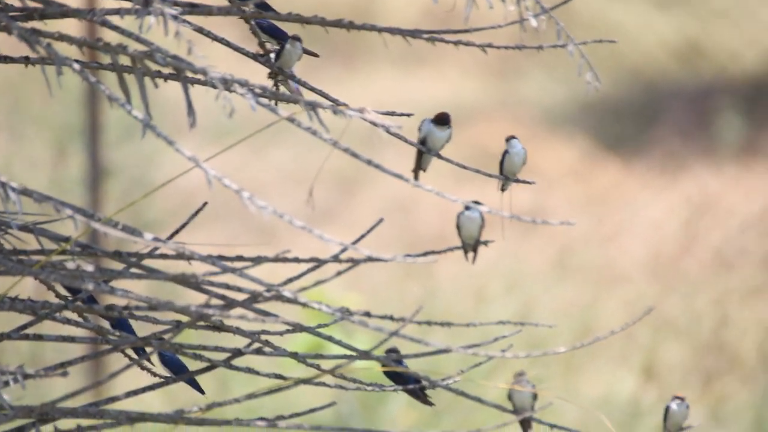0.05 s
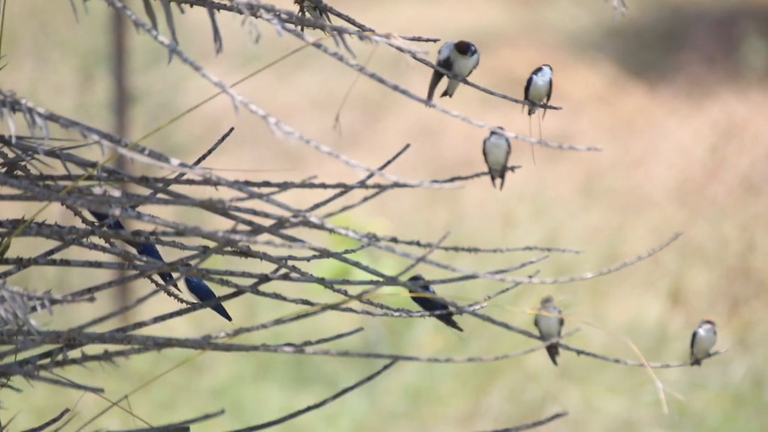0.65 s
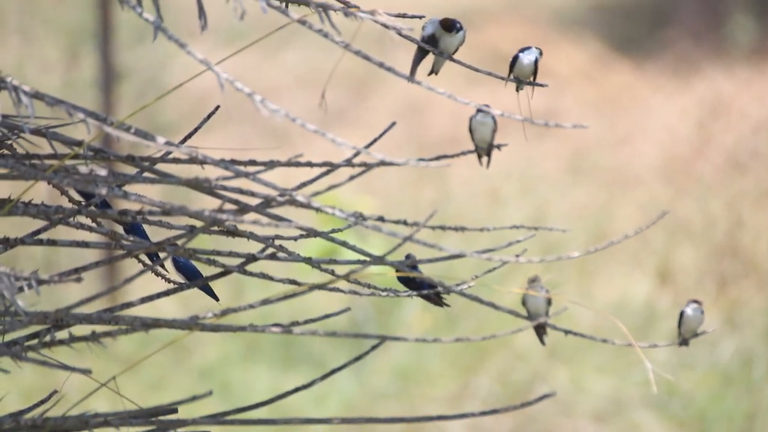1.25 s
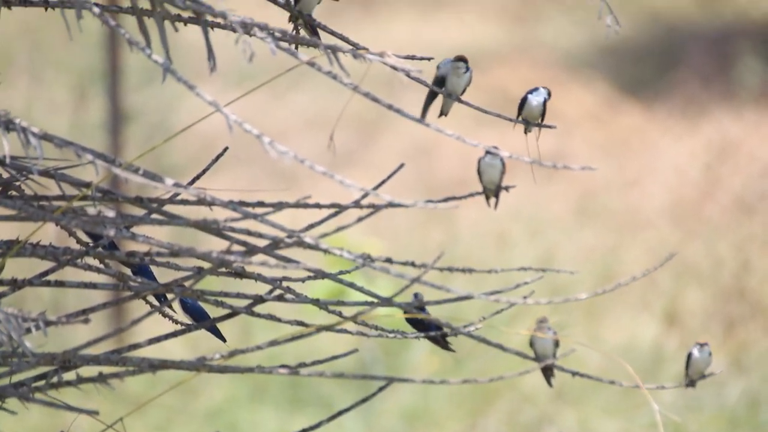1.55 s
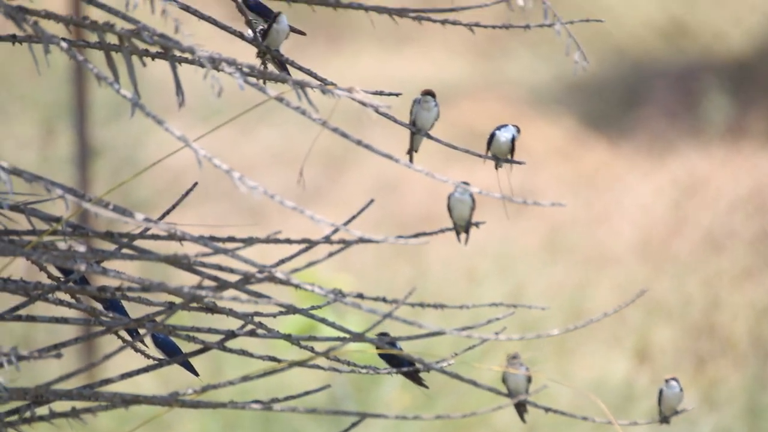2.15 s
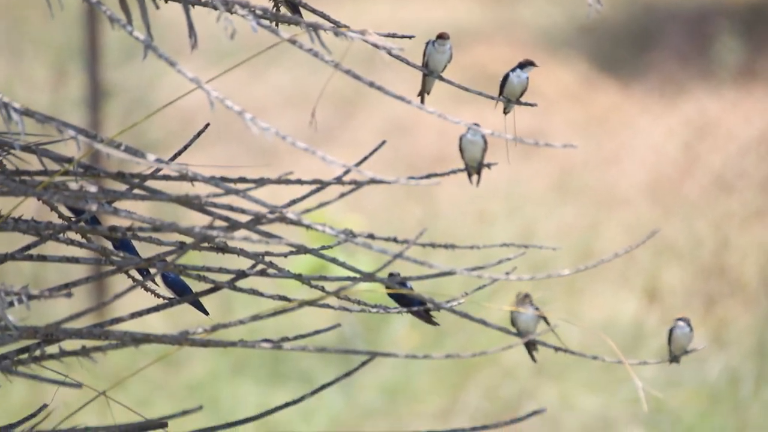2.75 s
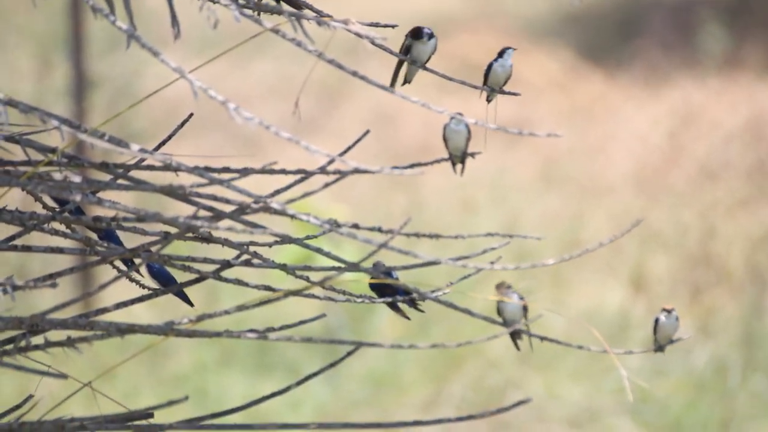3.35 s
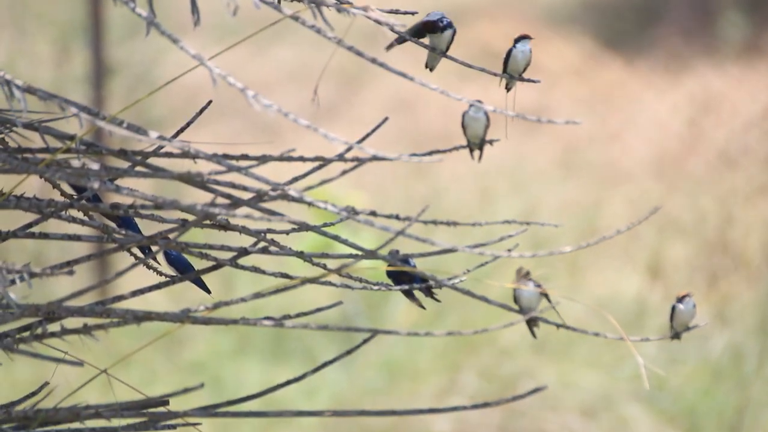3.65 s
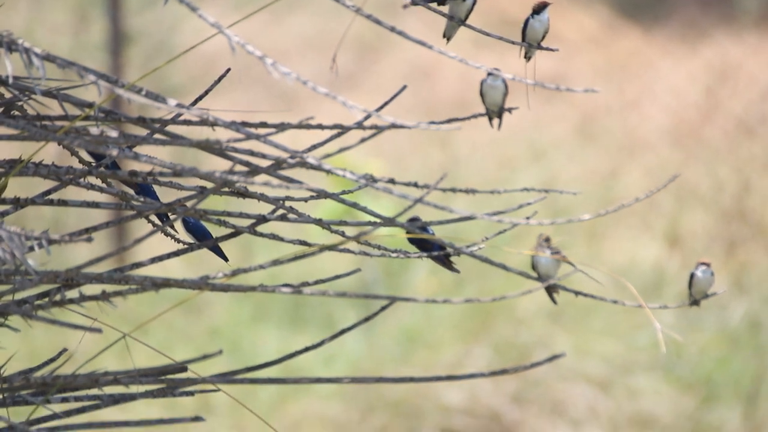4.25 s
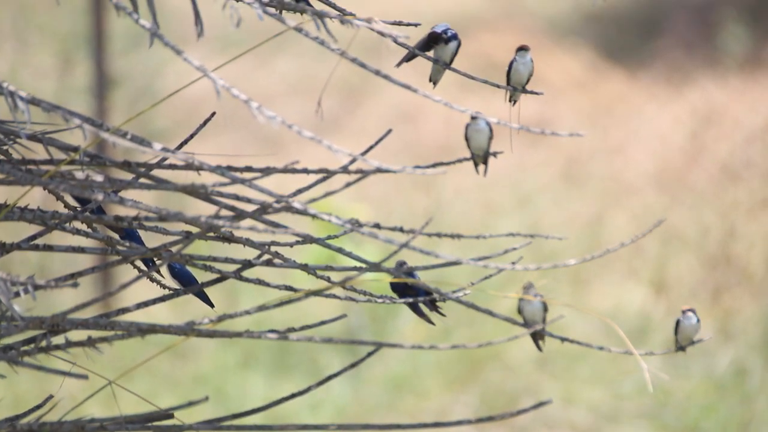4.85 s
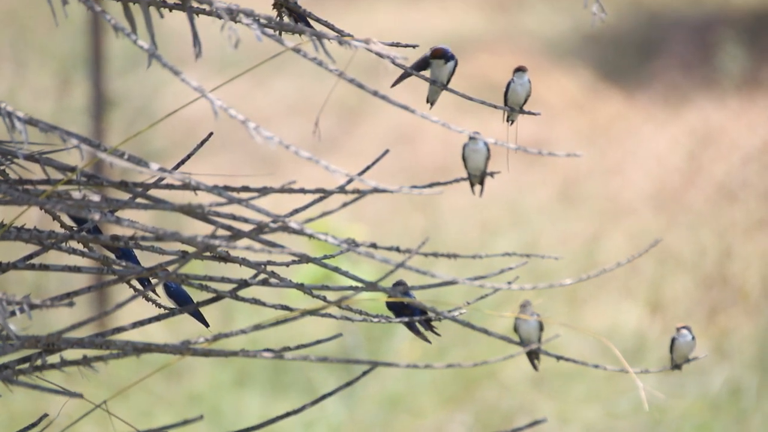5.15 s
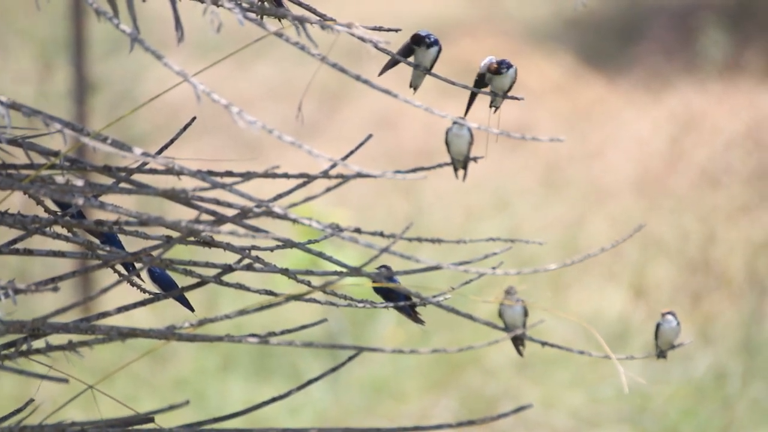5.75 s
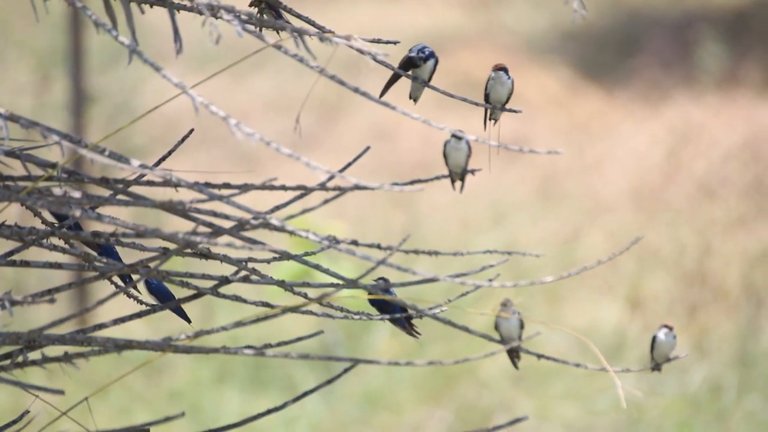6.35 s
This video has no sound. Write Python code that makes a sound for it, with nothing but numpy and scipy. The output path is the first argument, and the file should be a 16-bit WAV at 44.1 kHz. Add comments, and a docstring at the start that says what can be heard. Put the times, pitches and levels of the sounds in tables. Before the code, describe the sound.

Swallows twitter outdoors in quick, high chirps and raspy notes over a faint hiss of air.

```python
"""Swallows twitter in a thicket: quick falling slurs and chips sung with both sides of the syrinx.
Two phrases come twice each among loose chips, whistles, rasps of a flapping membrane, low nasal calls
and small knocks; a rising wheeze, a rattle of clicks and four hoarse whines lead to a last few chips.
A soft haze of hiss surrounds the twittering, and the trees scatter the song back. The air hisses faintly
and a light breeze rumbles on a mono microphone."""
import sys
import numpy as np
from scipy import signal
from scipy.fft import rfft, irfft, next_fast_len
from scipy.io import wavfile
from scipy.ndimage import map_coordinates

SR = 44100
rng = np.random.default_rng(int(sys.argv[2]) if len(sys.argv) > 2 else 0)


def int16_out(signal):
    """Quantize to a 16-bit WAV file."""
    q = np.round(np.clip(np.atleast_2d(signal).T, -1, 1) * 32767)
    wavfile.write(sys.argv[1], SR, q.astype(np.int16))


N = 287072

# Loose syllables. Each row: time in seconds, kind, pitch in Hz, relative level in dB.
# A chip is timed and pitched at its crest; a slur is timed at its start and pitched at mid-range.
LOOSE_SYLLABLES = [(0, "slur", 3450, -27.5), (.109, "tchit", 4960, -27), (.956, "tchit", 4660, -25),
                   (1.06, "chup", 3716, -24), (1.14, "slur", 3650, -30.5), (1.209, "tsip", 3430, -22),
                   (1.947, "tsip", 3505, -29), (2.088, "tsip", 3790, -26.5), (2.933, "tsip", 3600, -22),
                   (3.165, "squeak", 6310, -24.5), (3.291, "squeak", 5614, -20), (3.402, "tsip", 3770, -20),
                   (3.496, "slur", 3500, -25.5), (5.628, "slur", 4010, -35), (5.67, "squeak", 5010, -26.5),
                   (5.763, "squeak", 5230, -26), (5.915, "squeak", 5170, -32), (6.036, "slur", 4020, -42)]
# The opening phrase and a quicker flourish.
# Each row: time from the phrase's accent in seconds, kind, pitch in Hz, relative level in dB.
OPENING_PHRASE = [(-.097, "chup", 3790, -24), (-.037, "slur", 5100, -33), (0, "tsee", 5760, -18.5),
                  (.07, "slur", 3930, -32.5), (.145, "tchit", 5020, -22.5), (.298, "squeak", 4120, -25),
                  (.349, "chup", 3480, -21)]
FLOURISH_PHRASE = [(-.039, "tsip", 3670, -24), (0, "tchit", 4980, -22), (.077, "slur", 3380, -24),
                   (.102, "squeak", 3980, -21.5)]
# When each phrase is sung. Each entry: time of the accent in seconds.
OPENING_TIMES = [.34, 1.483]
FLOURISH_TIMES = [2.257, 2.687]
# Kinds of chip. Each row: pitch ratio of second to leading voice, second voice's relative level in dB,
# half the rise time in seconds, typical share of the pitch climbed, overtone gain in dB.
CHIP_KINDS = {"tchit": (.68, -4, .024, .25, 1.5), "tsee": (0.6, -14, .018, .15, -3),
              "squeak": (.8, -5, .016, .27, -1), "chup": (1.28, -8.5, .02, .19, -4),
              "tsip": (1.52, -10.5, .018, .25, -4)}
# One-voiced glides. Each row: start and length in seconds, first and last pitch in Hz, relative dB.
GLIDES = [(0.743, 0.087, 4000, 3190, -24.5), (.838, .06, 3175, 2970, -33), (3.408, .02, 3700, 3750, -26),
          (3.767, 0.026, 3650, 4340, -24.5), (3.795, 0.0227, 3185, 4010, -16.5),
          (3.984, 0.086, 3086, 3320, -37), (5.995, .05, 3600, 4230, -36.5), (6.478, .032, 5200, 6000, -38)]
# Harsh notes. Each row: start and length in seconds, pitch in Hz, level in dB.
RASP_NOTES = [(0.618, 0.062, 3060, -29), (.765, .11, 3000, -31), (1.227, .067, 2567, -33),
              (1.923, 0.071, 2955, -27.5), (2.464, 0.11, 2557, -31), (2.915, 0.081, 2953, -29),
              (3.034, .15, 2700, -27.5), (3.24, .075, 3400, -29), (3.248, .033, 5310, -21.5),
              (3.336, 0.042, 4400, -25), (3.517, .094, 2802, -26.5), (3.625, .05, 5200, -24.5),
              (3.635, 0.086, 3650, -23), (4.371, .012, 3760, -19), (4.665, 0.013, 3800, -20),
              (5.895, .058, 3100, -30.5)]
# Low calls. Each row: start and length in seconds, first and last pitch in Hz, level in dB.
NASAL_CALLS = [(2.532, .15, 419.3, 410.7, -35), (3.547, 0.21, 385.3, 331, -41),
               (3.763, 0.077, 433.6, 452.5, -36)]
# Knocks in the branches. Each row: start in seconds, ring frequency in Hz, initial ring level in dB.
KNOCKS = [(3.131, 345, -39), (5.982, 952, -36.5), (6.133, 970, -37.5)]
# Course of the wheeze. Each row: time in seconds, pulse rate in Hz, level in dB.
WHEEZE_COURSE = [(3.92, 440, -47), (4.0, 452, -39), (4.11, 531, -34.5), (4.18, 547, -34),
                 (4.33, 622.4, -28.5), (4.37, 616, -30)]
# Hoarse, drawn-out notes. Each row: start and length in seconds, relative level in dB.
WHINE_NOTES = [(4.681, 0.11, -33.5), (4.905, 0.12, -35.5), (5.101, .085, -35.5), (5.235, .1, -35)]
# Buffets of wind. Each row: time of the peak in seconds, typical peak level in dB.
WIND_GUSTS = [(1.2, -62), (1.62, -56.5), (1.97, -52.5), (2.52, -49), (5.35, -62)]
# Spectra of the outdoor air, the hiss in and around the song, the throat's resonances and the clicks.
# Each row: frequency in Hz, relative level in dB.
AIR_SPECTRUM = [(30, -13.5), (150, -7.5), (310, -4), (600, -10), (1000, -4), (2700, -2.5), (8100, -15.5),
                (15500, -44.5)]
HISS_SPECTRUM = [(900, -17), (3300, 7), (6300, 1), (8200, -12), (9700, -16.5), (12300, -15.5), (16000, -27)]
THROAT_SPECTRUM = [(1000, -18.5), (2700, -19), (4000, 0.5), (5300, -4), (9500, -42), (12000, -24),
                   (15000, -45)]
CLICK_SPECTRUM = [(1000, -21), (4500, -3), (7200, 4.5), (9500, -15), (16000, -25)]
# Reverberation of the trees. Each row: frequency in Hz, time to decay by 60 dB in seconds.
THICKET_T60 = [(300, 0.71), (4000, 0.62), (13000, 0.086)]


def amp(db):
    """Decibels as an amplitude ratio."""
    return 10 ** (np.asarray(db) / 20)


def unit(x):
    """The signal scaled to rms 1."""
    return x / np.sqrt(np.mean(x ** 2) + 1e-20)


def along(points, hz):
    """Interpolation of (Hz, value) points on a log frequency axis."""
    knots_hz, values = np.transpose(points)
    return np.interp(np.log(hz + 1), np.log(knots_hz), values)


def curves(rows):
    """One value per sample for each column after the time."""
    times, *columns = np.transpose(rows)
    return [np.interp(np.arange(N) / SR, times, column) for column in columns]


def during(rows):
    """A soft gate over the time that a curve spans."""
    t = np.arange(N) / SR
    return np.clip(np.minimum(t - rows[0][0], rows[-1][0] - t) / 0.022, 0, 1)


def wobble(rate, size):
    """A smooth random curve, rate knots a second."""
    knots = rng.standard_normal(int(size * rate / SR) + 4)
    return map_coordinates(knots, [np.arange(size) * rate / SR])


def filtered(x, response):
    """Linear filtering: the spectrum is multiplied by a frequency response."""
    size = next_fast_len(N + SR // 2)
    return irfft(rfft(x, size) * response(np.fft.rfftfreq(size, 1 / SR)), size)[..., :N]


def coloured(x, spectrum):
    """x shaped by (Hz, dB) points and falling away below the first, at rms 1."""
    return unit(filtered(x, lambda hz: amp(along(spectrum, hz)) * np.minimum(hz / spectrum[0][0], 1) ** 2))


def add(track, start_s, sound):
    """Superposition: a sound is summed into the track from its start on."""
    part = track[max(round(start_s * SR), 0):][:len(sound)]
    part += sound[:len(part)]


def phase_of(hz, jitter, rate):
    """Phase is the integral of frequency; the membrane's pitch trembles by the share jitter."""
    return 2 * np.pi * np.cumsum(hz * (1 + jitter * wobble(rate, len(hz)))) / SR


def swell(size, edge):
    """A note's envelope: the share edge of it is spent rising and falling."""
    return signal.windows.tukey(size, min(edge, 1))


def syllables():
    """Every chip and slur: the loose twitter and the repeated phrases."""
    phrases = [(OPENING_TIMES, OPENING_PHRASE), (FLOURISH_TIMES, FLOURISH_PHRASE)]
    repeated = [(at + s, *rest) for times, phrase in phrases for at in times for s, *rest in phrase]
    return LOOSE_SYLLABLES + repeated


def air_and_breeze(air_db=-42.5, calm_db=-71, gust_half_width_s=.1):
    """Amplitude-modulated noise: the air crackles faintly and wind buffets the microphone."""
    air = coloured(rng.standard_normal(N) * amp(2.2 * wobble(70, N)), AIR_SPECTRUM)
    rumble = coloured(rng.standard_normal(N), [(25, -2.5), (55, -11), (1000, -72)])
    t = np.arange(N) / SR
    gusts = sum(amp(db) / (1 + ((t - at) / gust_half_width_s) ** 2) for at, db in WIND_GUSTS)
    breeze = (amp(calm_db) + gusts) * amp(2.8 * wobble(8, N))
    return amp(air_db) * air + breeze * rumble


def whistles(gain_db=3, second_db=-24, third_db=-34, flutter_db=3.0, ease=1.8, slur_s=0.0263, fall=.12):
    """One voice in nearly sinusoidal vibration eases into its last pitch; a slur is a brief fall."""
    out = np.zeros(N)
    slurs = [(start, slur_s, hz * (1 + fall / 2), hz * (1 - fall / 2), db)
             for start, kind, hz, db in syllables() if kind == "slur"]
    for start, length, first_hz, last_hz, db in slurs + GLIDES:
        u = np.linspace(0, 1, int(length * SR))
        phase = phase_of(last_hz + (first_hz - last_hz) * (1 - u) ** ease, jitter=0.021, rate=800)
        tone = np.sin(phase) + amp(second_db) * np.sin(2 * phase) + amp(third_db) * np.sin(3 * phase)
        level = amp(db + gain_db + flutter_db * wobble(192, len(u)))
        add(out, start, level * swell(len(u), edge=0.097) * tone)
    return out


def beak_notch(x, dip_hz=9800, width_hz=1100, dip_db=-11):
    """The windpipe and beak act as a band-stop filter on the overtones."""
    return filtered(x, lambda hz: amp(dip_db * np.exp(-((hz - dip_hz) / width_hz) ** 2)))


def following_hiss(voice, gain_db, span_s):
    """Envelope following: hiss tracks the voice's running rms slope, so high notes raise it most."""
    window = np.hanning(int(span_s * SR))
    mean_square = signal.fftconvolve(np.gradient(voice) ** 2, window / window.sum(), "same")
    return amp(gain_db) * np.sqrt(np.abs(mean_square)) * coloured(rng.standard_normal(N), HISS_SPECTRUM)


def thicket(x, early_db=-9, late_db=-6, early_t60=0.13, pieces=14):
    """Scattering: near branches answer at once, far trees later; the paths change as the birds turn."""
    out = np.zeros(N)
    for piece in np.array_split(np.arange(N), pieces):
        hz, t, noise = signal.stft(rng.standard_normal(SR // 2), SR, nperseg=256)
        decay = amp(-60 * t / along(THICKET_T60, hz)[:, None])
        late = signal.istft(noise * decay, SR, nperseg=256)[1]
        t = np.arange(len(late)) / SR
        early = rng.standard_normal(len(t)) * amp(-60 * t / early_t60) * (t > .002)
        late *= 1 - np.exp(-t / 0.0062)
        response = amp(early_db) * early / np.linalg.norm(early)
        response += amp(late_db) * late / np.linalg.norm(late)
        add(out, piece[0] / SR, signal.fftconvolve(x[piece], response))
    return out


def distant_chatter(level_db=-37, hz=3100, spread=.15, length_s=0.0401, until_s=3.8, count=44):
    """Birds farther off sing faint glides, roughened by random frequency modulation."""
    out = np.zeros(N)
    u = np.linspace(-.5, .5, int(length_s * SR))
    for k, (shift, pitch, glide, loud) in enumerate(rng.standard_normal((count, 4))):
        phase = phase_of(hz * np.exp(spread * (pitch + glide * u)), jitter=0.044, rate=894)
        start = until_s * (k + .5 + .3 * shift) / count
        add(out, start, amp(level_db + 2 * loud) * swell(len(u), edge=0.47) * np.sin(phase))
    return out


def chips(gain_db=3, sum_db=-13, octave_db=-18, sideband_db=-12, top_db=-22, droop=.6, tremor_db=2.6):
    """Both sides of the syrinx arch in pitch; nonlinear coupling adds combination tones and octaves."""
    out = np.zeros(N)
    for crest_s, kind, hz, db in syllables():
        if kind not in CHIP_KINDS:
            continue
        ratio, second_db, half_rise_s, depth, overtone_db = CHIP_KINDS[kind]
        (low_hz, low_db), (high_hz, high_db) = sorted([(hz, db), (hz * ratio, db + second_db)])
        t = np.arange(-2 * half_rise_s, half_rise_s, 1 / SR)
        u = t / half_rise_s
        sag = depth * rng.uniform(.6, 1.3) * np.where(u < 0, 1, droop)  # falls less than it climbed
        high = phase_of(high_hz * (1 - sag + sag * np.exp(-(u / 0.62) ** 2)), jitter=0.019, rate=720)
        low = phase_of(low_hz * (1 - sag + sag * np.exp(-(u / 0.6) ** 2)), jitter=0.024, rate=1100)
        high_level = amp(high_db) * np.exp(-((u + 0.26) / 0.7) ** 4)
        low_level = amp(low_db) * np.exp(-((u + 0.028) / 0.46) ** 4)  # joins only around the crest
        voices = high_level * np.sin(high) + low_level * np.sin(low)
        flutter = 0.21 * wobble(917, len(t))
        combinations = amp(sum_db) * np.sin(high + low + flutter)
        combinations += amp(sideband_db) * np.sin(2 * high - low + flutter)
        combinations += amp(top_db) * np.sin(high + 2 * low + flutter)
        octaves = amp(top_db) * high_level * np.sin(2 * high)
        octaves += amp(octave_db) * low_level * np.sin(2 * low + flutter)
        overtones = np.sqrt(high_level * low_level) * combinations + octaves
        tremor = amp(tremor_db * wobble(306, len(t)))
        add(out, crest_s + t[0], tremor * (voices + amp(overtone_db) * overtones))
    return amp(gain_db) * out


def rasps(overtone_db=-24, flap_hz=520, flap_index=1.1, fall=0.0602):
    """Modulation by an unevenly flapping membrane spreads a falling note into grating sidebands."""
    out = np.zeros(N)
    for start, length, hz, db in RASP_NOTES:
        n = int(length * SR)
        flap = np.sin(phase_of(np.full(n, flap_hz), jitter=0.0776, rate=149.6))
        pitch = hz * (1 + fall * np.linspace(.5, -.5, n))
        phase = phase_of(pitch, jitter=0.06, rate=170) + flap_index * flap
        tone = np.sin(phase) + amp(overtone_db) * np.sin(2 * phase)
        tone *= amp(2.6 * wobble(131.3, n) + 1.7 * flap)
        add(out, start, amp(db) * np.sqrt(np.hanning(n)) * unit(tone))
    return out


def nasal_calls(rolloff_db=3.5):
    """A missing fundamental: these low calls sound only harmonics three to seven."""
    out = np.zeros(N)
    for start, length, first_hz, last_hz, db in NASAL_CALLS:
        phase = phase_of(np.linspace(first_hz, last_hz, int(length * SR)), jitter=0.018, rate=400)
        tone = sum(amp(-rolloff_db * k) * np.sin(k * phase) for k in range(3, 8))
        add(out, start, amp(db) * swell(len(tone), edge=0.26) * unit(tone))
    return out


def branch_knocks(ring_t60=0.07, crack_t60=0.0028, crack_db=-3):
    """An impact gives a short crack and excites one damped mode of the wood."""
    out = np.zeros(N)
    t = np.arange(SR // 10) / SR
    for start, hz, db in KNOCKS:
        crack = amp(crack_db - 60 * t / crack_t60) * rng.standard_normal(len(t))
        ring = amp(-60 * t / ring_t60) * np.sin(2 * np.pi * hz * t)
        add(out, start, amp(db) * (ring + crack))
    return out


def beak_hiss():
    """Turbulence in the beak at rms 1; rapid amplitude modulation makes it crackle."""
    return coloured(rng.standard_normal(N) * amp(4.1 * wobble(400, N)), HISS_SPECTRUM)


def wheeze(hiss_db=-38):
    """Source and filter: the throat's resonances weight the harmonics of a rising buzz, over hiss."""
    pitch, db = curves(WHEEZE_COURSE)
    gate = during(WHEEZE_COURSE)
    on = gate > 0
    phase = phase_of(pitch[on], jitter=0.006, rate=800)
    buzz = np.zeros(N)
    for k in range(2, 25):
        resonance = amp(along(THROAT_SPECTRUM, k * pitch[on]))
        buzz[on] += resonance * np.sin(k * phase + rng.uniform(0, 2 * np.pi))
    buzz[on] = unit(buzz[on])
    return gate * (amp(db) * buzz + amp(hiss_db) * beak_hiss())


def rattle(start_s=4.417, gap_s=.035, count=7, loudest=4, click_s=.0012, gain_db=-8.5, hiss_db=-41):
    """Brief bursts have broad spectra: bright, evenly paced clicks swell and ebb over a little hiss."""
    clicks, hiss_level = np.zeros(N), np.zeros(N)
    u = np.arange(SR // 50) / SR / click_s
    for k in range(count):
        burst = 2 * u * np.exp(1 - 2 * u) * rng.standard_normal(len(u))
        taper_db = 1.8 * abs(k - loudest)
        add(clicks, start_s + k * gap_s, amp(gain_db - taper_db) * burst)
    add(hiss_level, start_s, amp(hiss_db) * swell(int((count + 3) * gap_s * SR), edge=0.12))
    return filtered(clicks, lambda hz: amp(along(CLICK_SPECTRUM, hz))) + hiss_level * beak_hiss()


def whines(hz=3205, rise_hz=462, upper_ratio=1.3, upper_db=-5, gain_db=1, swell_db=5,
           hiss_db=4, hiss_swell_db=17):
    """Biphonation: two thin voices bend upwards and grow, breaking into hiss at the end."""
    out, hiss_level = np.zeros(N), np.zeros(N)
    for start, length, db in WHINE_NOTES:
        u = np.linspace(0, 1, int(length * SR))
        pitch = hz + rise_hz * u ** 2
        lower = np.sin(phase_of(pitch, jitter=0.026, rate=800))
        upper = np.sin(phase_of(upper_ratio * pitch, jitter=0.033, rate=800))
        level = amp(db) * swell(len(u), edge=0.13)
        growth = amp(gain_db + swell_db * (u - .5) + 2.3 * wobble(198, len(u)))
        add(out, start, level * growth * (lower + amp(upper_db) * upper))
        add(hiss_level, start, level * amp(hiss_db - hiss_swell_db * (1 - u)))
    return out + hiss_level * beak_hiss()


def scene():
    """Direct sound, scattered sound and background superpose, alike in both channels."""
    chipping = chips()
    voices = beak_notch(chipping + whistles() + rasps())
    scrape = following_hiss(chipping, gain_db=-11, span_s=0.0059)  # sharp, on each chip
    # a soft haze of hiss that swells just before and around each note
    noise_halo = following_hiss(voices, gain_db=-11.5, span_s=0.1)
    direct = voices + scrape + noise_halo + distant_chatter() + nasal_calls()
    direct += wheeze() + rattle() + whines() + branch_knocks()
    mono = direct + thicket(direct) + air_and_breeze()
    return np.array([mono, mono])


def record(dry, top_hz=15850):
    """An ideal low-pass filter: nothing passes above the band limit."""
    return filtered(dry, lambda hz: hz < top_hz)


dry = scene()
out = record(dry)
int16_out(out)
```